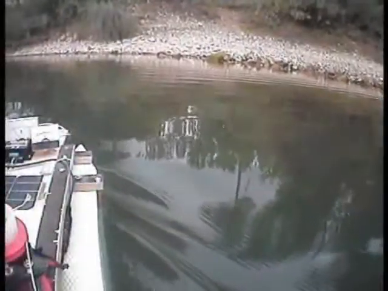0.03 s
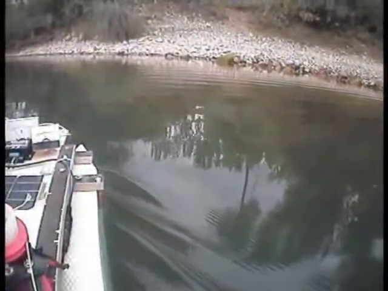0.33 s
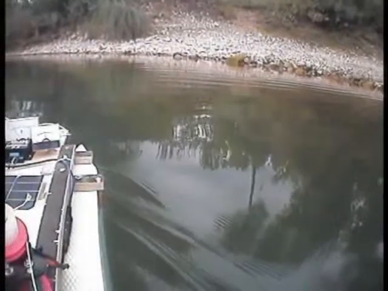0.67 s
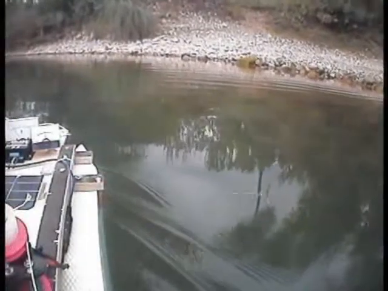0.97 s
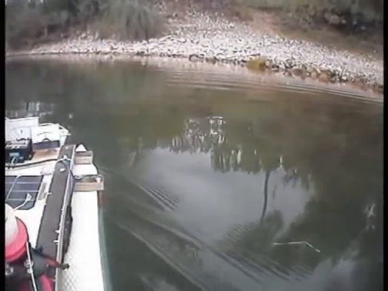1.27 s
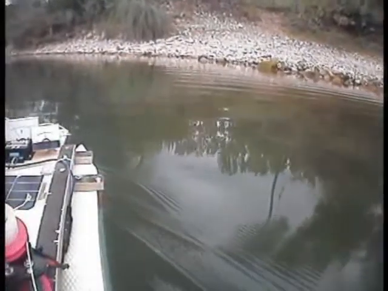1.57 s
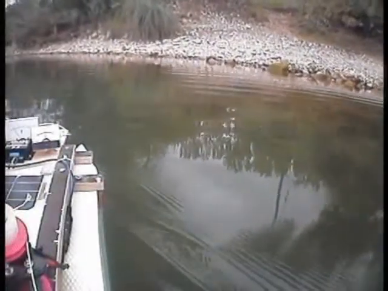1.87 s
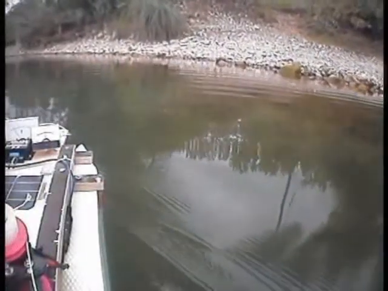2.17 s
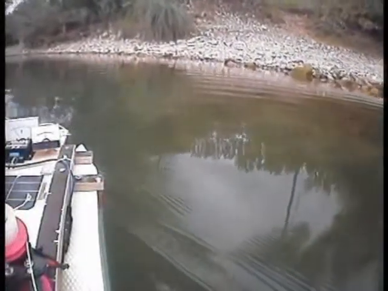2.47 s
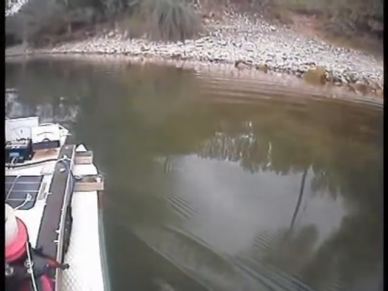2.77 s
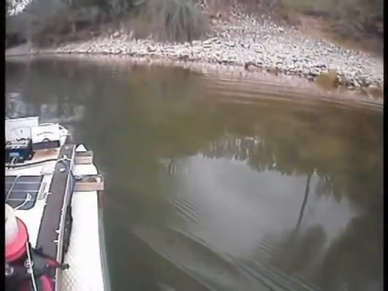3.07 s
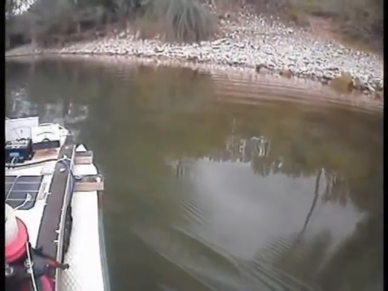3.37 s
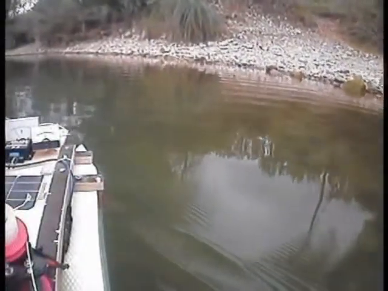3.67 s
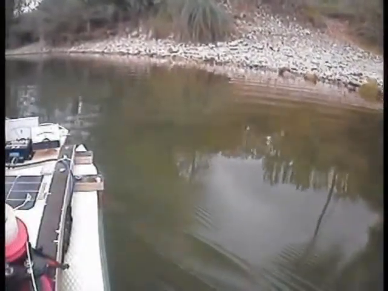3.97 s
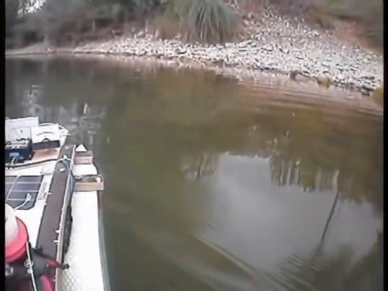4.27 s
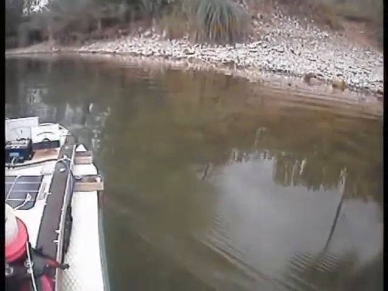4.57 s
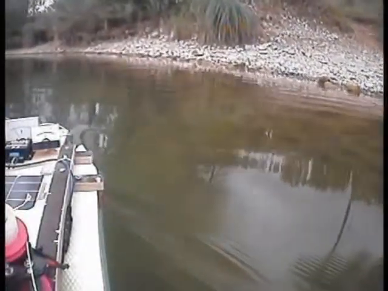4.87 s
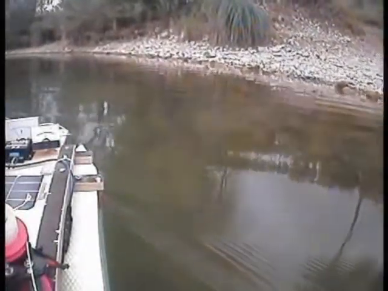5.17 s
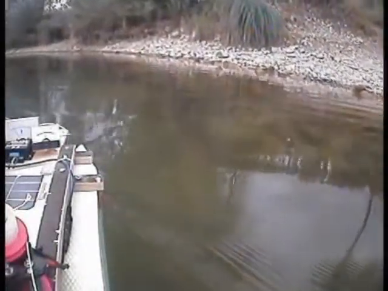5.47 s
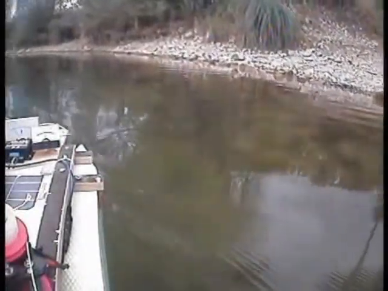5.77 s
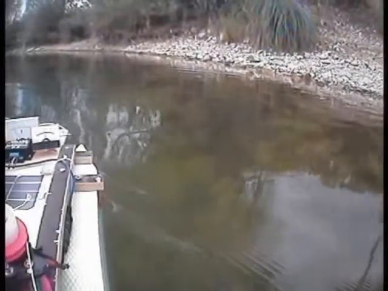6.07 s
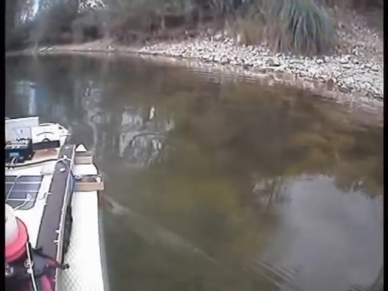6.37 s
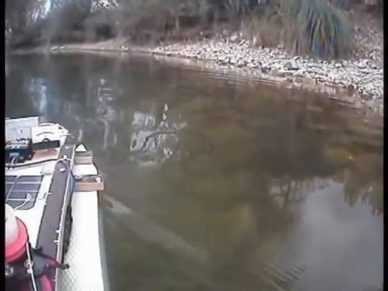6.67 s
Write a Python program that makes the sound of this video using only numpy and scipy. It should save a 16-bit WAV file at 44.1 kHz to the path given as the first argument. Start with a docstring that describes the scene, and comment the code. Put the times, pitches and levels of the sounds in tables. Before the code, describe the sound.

From the deck of a model boat on a pond, all in the left ear, comes a steady electrical buzz with a wavering, throbbing motor whine. Water washes softly along the hull beneath hiss, scattered spark snaps and a thin whistle. The motor backs off a little early on. The rudder servo buzzes in brief spurts, then works continuously through a long turn in the second half, as the whine gradually drops.

```python
"""A model boat cruising on a pond, heard from the one microphone of its deck camera, on the left.
From the start the motor whines in the hull and throbs with each shaft turn, over water, brush hiss and
the camera's line-scan whistle. Motor current, chopped once per radio frame, buzzes in the camera's
supply; sparks crackle and the rudder servo adds bursts of pulses. Just after 1 s the throttle eases.
From about 4 s the servo strains through a long turn, while the whine goes on slowly sinking."""
import sys
import numpy as np
from scipy import signal
from scipy.fft import rfft, irfft, next_fast_len
from scipy.io import wavfile
from scipy.ndimage import uniform_filter1d, map_coordinates

SR = 44100
rng = np.random.default_rng(int(sys.argv[2]) if len(sys.argv) > 2 else 0)


def waveform_to_disk(signal):
    """Save audio, clipped to [-1, 1], as 16-bit WAV at the path in sys.argv[1]."""
    frames = np.transpose(np.atleast_2d(signal))
    scaled = np.clip(frames, -1, 1) * 32767
    samples = np.round(scaled).astype(np.int16)
    wavfile.write(sys.argv[1], SR, samples)


N = 296440
T = np.arange(N) / SR
FRAME_HZ, FRAME_START, MOTOR_DELAY = 44.446, .104, .091  # radio frame rate; two offsets in frames
TOP_HZ = 15900  # the camera's band limit


def amp(db):
    """Decibels to gain."""
    return 10 ** (np.asarray(db) / 20)


def unit(x):
    """Scale to rms 1."""
    return x / np.sqrt(np.mean(x ** 2) + 1e-20)


def wobble(rate):
    """A smooth random curve, rate knots a second."""
    return map_coordinates(rng.standard_normal(int(N * rate / SR) + 4), [T * rate])


def filtered(x, response):
    """Pass x through a complex response of frequency."""
    size = next_fast_len(N + SR // 2)
    return irfft(rfft(x, size) * response(np.fft.rfftfreq(size, 1 / SR)), size)[:N]


def noise(spectrum):
    """Noise of rms 1 shaped by rows of frequency_hz, level_db."""
    hz, db = np.transpose(spectrum)
    colour = lambda f: amp(np.interp(np.log(f + 1), np.log(hz + 1), db))
    return unit(filtered(rng.standard_normal(N), colour))


def resonance(f, hz, width):
    """Causal response of one mode."""
    return 1j * f * width / (hz * hz - f * f + 1j * f * width)


def cycle(turns, lag):
    """A swing that peaks once a turn, lag turns late."""
    return np.cos(2 * np.pi * (turns - lag))


def wash():
    """Water runs along the hull, wavering slightly in level."""
    # water spectrum: frequency_hz, density_db
    spectrum = [(20, 13), (60, 6.5), (200, 1.5), (500, 2.5), (1300, -7), (2500, -17.5), (4000, -24)]
    return amp(-51.5 + .64 * wobble(11)) * noise(spectrum)


def whistle(level_db=-71, line_hz=15625, field_hz=50, blank_share=.12):
    """The camera's line-scan tone drops out once per field, flickers and flares now and then."""
    # flares of the whistle: centre_s, half_length_s, rise_db
    flares = [(.06, .2, 11), (3.48, .08, 10), (4.7, 0.34, 7)]
    flare_db = sum(rise_db * np.exp(-((T - s) / half) ** 2) for s, half, rise_db in flares)
    flicker_db = 3.5 * wobble(14)
    gate = uniform_filter1d(1. * (T * field_hz % 1 > blank_share), size=24)
    return amp(level_db + flare_db + flicker_db) * unit(gate * np.sin(2 * np.pi * line_hz * T))


def shaft_rub(shaft):
    """The shaft rubs once a turn and makes the drive sing faintly."""
    # narrow rings of the drive: pitch_hz, width_hz, level_db, swell_db, lag_turns
    rings = [(1792, 200, -63.5, 4.5, 0.54), (4470, 70, -72, 0, 0.18), (6730, 200, -71, 3, 0.039),
             (11750, 60, -78.5, 0, .2)]
    out = np.zeros(N)
    for hz, width, db, swell_db, lag in rings:
        ring = unit(filtered(rng.standard_normal(N), lambda f: resonance(f, hz, width) ** 2))
        out += ring * amp(db + swell_db * cycle(shaft, lag))
    return out


def brush_hiss(frame, shaft, level_db=-55.5, dull_hz=14000):
    """The motor brushes hiss, finely grained, pulsing a little with the frame and the shaft."""
    # hiss spectrum: frequency_hz, density_db
    spectrum = [(1180, -68), (2000, -3), (2100, -1), (2410, -7), (2760, -11), (3630, -13), (4890, -11),
                (5230, -11), (6930, -7.5), (8430, -15.5), (10800, -20.5), (11800, -21), (13600, -32),
                (14700, -16), (15300, -19.5)]
    sizzle = filtered(noise(spectrum), lambda f: 1 / (1 + (f / dull_hz) ** 8))
    pulse_db = 1.5 * cycle(frame, .51) + .83 * cycle(shaft, .19)
    return sizzle * amp(level_db + pulse_db + 1.97 * wobble(700))


def rattle(frame, shaft, level_db=-52):
    """Brushes and gears shake the hull, hardest under current."""
    # hull resonances: pitch_hz, width_hz, gain_db
    modes = [(530, 450, -12.5), (829, 142, -0.5), (1060, 97, 0), (1504, 530, -9.5), (2206, 800, -31)]
    pulse_db = 3 * cycle(frame, .29) + 1.9 * cycle(shaft, .33)
    shake = rng.standard_normal(N) * amp(pulse_db + wobble(300))
    hull = lambda f: sum((-1) ** k * amp(db) * resonance(f, hz, width)
                         for k, (hz, width, db) in enumerate(modes))
    return amp(level_db) * unit(filtered(shake, lambda f: hull(f) / (1 + (f / 2800) ** 4)))


def sparks(gain_db=1, tail_db=-22, tail_t60_s=.031):
    """Each spark is one spike with its own colour and a brief sizzle after it."""
    # loud sparks: start_s, relative_peak_db, centre_hz, width_octaves
    snaps = [(0.0664, -28.5, 3000, 2.45), (0.2411, -24.5, 6270, 2), (.414, -22.5, 3600, 3),
             (.598, -26.5, 6300, 1.3), (1.184, -25, 4400, 2.4), (1.3535, -33.5, 4500, 1.5),
             (1.5448, -29.5, 3980, 2.3), (2.158, -27.5, 2480, 2.7), (2.34, -33, 6600, 1.3),
             (2.531, -27, 5800, 0.99), (3.154, -34.5, 2800, 1.7), (3.339, -30.5, 2800, 2.7),
             (3.533, -32.5, 7350, 1.3), (5.1847, -29, 3900, 2.4), (5.5743, -32, 5200, 1.9),
             (6.2187, -33.5, 2000, 1.6)]
    out, t = np.zeros(N + SR), np.arange(SR // 20) / SR
    for start_s, db, hz, octaves in snaps:
        burst = (t == 0) + rng.standard_normal(len(t)) * amp(tail_db - 60 * t / tail_t60_s)
        band = np.minimum(hz * 2 ** (np.array([-.5, .5]) * octaves), TOP_HZ)
        snap = signal.sosfilt(signal.butter(2, band, "band", fs=SR, output="sos"), burst)
        out[round(start_s * SR):][:len(t)] += amp(db + gain_db) * snap / np.abs(snap).max()
    return out[:N]


def whine(frame, shaft, pitch_hz=1070, sink_hz_per_s=7, level_db=-48.5, fade_db_per_s=.36):
    """The commutator tone drops each frame and climbs back under current, scraping unevenly."""
    # commutator partials: harmonic_number, relative_db
    partials = [(1, -2.5), (2, -10.5), (3, -22), (6, -23)]
    # hull panels set ringing by the whine: pitch_hz, width_hz, over_direct_db
    panels = [(1029, 65, 2.5), (2110, 170, -0.5)]
    sag = uniform_filter1d(np.maximum(1 - (frame - MOTOR_DELAY) % 1 / .52, 0), size=220)
    depth = .19 * (1 + .542 * cycle(shaft, .58))  # deepest where the shaft binds
    speed = 1 + .037 * cycle(frame, .7) - depth * sag + .00897 * wobble(170)
    speed += .04025 * cycle(shaft, .0803) + .014 * cycle(shaft / 5, .82)  # a surge every fifth turn
    phase = 2 * np.pi * np.cumsum((pitch_hz - sink_hz_per_s * T) * speed) / SR
    tone = np.zeros(N)
    for k, db in partials:
        ratio = k * 1.02 ** (k - 1)  # the overtones lie sharp
        tone += amp(db) * unit(np.sin(ratio * phase) * amp(2 * wobble(200)))
    tone *= amp(1.83 * cycle(shaft, .39) + 3 * cycle(frame, .39))
    hull = lambda f: 1 + sum(amp(db) * resonance(f, hz, width) for hz, width, db in panels)
    return amp(level_db - fade_db_per_s * T) * unit(filtered(tone, hull))


def servo_current(frame, height=1.202, trim_ms=1.026, rise_ms=.76):
    """The working servo draws a pulse a frame that builds up and is cut dead, longer under strain."""
    # spells of rudder trimming: start_s, end_s
    trims = [(.05, .68), (.91, .93), (1.38, 1.475), (1.58, 1.77), (3.49, 3.57), (3.97, 6.72)]
    # rudder strain through the long turn: time_s, added_pulse_ms
    strain = [(4.63, 0), (4.68, 2.5), (4.8, 1.03), (5.06, 4), (5.15, 2), (5.52, 1.5), (5.7, 3), (6.02, 1.4),
              (6.06, 0), (6.18, 0), (6.28, 3)]
    # jerks of the rudder: start_s, end_s, pulse_ms
    jerks = [(.05, .12, 4.3), (4.555, 4.58, 7.5), (6.645, 6.72, 7.6)]
    index = frame.astype(int)
    frame_s = (np.arange(index[-1] + 1) - FRAME_START) / FRAME_HZ
    length_ms = trim_ms * sum((frame_s >= start) & (frame_s < end) for start, end in trims)
    length_ms += np.interp(frame_s, *np.transpose(strain))
    for start, end, jerk_ms in jerks:
        length_ms[(frame_s >= start) & (frame_s < end)] = jerk_ms
    length_ms *= np.exp(.1 * rng.standard_normal(len(frame_s)))
    age_ms = frame % 1 / FRAME_HZ * 1000
    return height * (1 - np.exp(-age_ms / rise_ms)) * (age_ms < length_ms[index])


def motor_current(frame, shaft, ease_s=(1.16, 1.23)):
    """The speed controller switches the motor on for the throttle's share of every frame."""
    duty = np.interp(T, ease_s, [.493, .423])
    load = 1 + .09 * cycle(shaft, .53)  # the shaft binds once a turn and draws more current
    return load * ((frame - MOTOR_DELAY) % 1 < duty)


def kicks(current, gain_db, centre_hz, width_hz):
    """Whenever the current is cut, the winding kicks back with a crisp tick."""
    cuts = np.minimum(np.diff(current, prepend=current[0]), 0) * amp(1.5 * wobble(90))
    tick = lambda f: resonance(f, centre_hz, width_hz) / (1 + 1j * f / 5000)
    return amp(gain_db) * filtered(cuts, tick)


def buzz(current, soft_hz, edge, gain_db=-25.5, coupling_hz=53, damping=1.465):
    """The camera's input coupling turns each supply step into a sharp-edged thump with an undershoot."""
    coupling = lambda f: -f * f / (coupling_hz ** 2 - f * f + 1j * f * coupling_hz * damping)
    thump = lambda f: 1 / (1 + 1j * f / soft_hz) + edge / (1 + 1j * f / 2000)
    return amp(gain_db) * filtered(current, lambda f: coupling(f) * thump(f))


def scene(shaft_hz=5.32, slowing_hz_per_s=.084):
    """On deck, drive and buzz follow the radio frame and the shaft; only a trace reaches the right."""
    frame = T * FRAME_HZ + FRAME_START  # frames elapsed
    shaft = np.cumsum(shaft_hz - slowing_hz_per_s * T) / SR  # turns elapsed
    motor, servo = motor_current(frame, shaft), servo_current(frame)
    ticks = kicks(motor, gain_db=-25.5, centre_hz=2730, width_hz=1300)
    ticks += kicks(servo, gain_db=-22, centre_hz=2500, width_hz=1860)
    supply = buzz(motor, soft_hz=314, edge=.012) + buzz(servo, soft_hz=800, edge=.08)
    electrics = supply + ticks + sparks() + whistle()
    drive = whine(frame, shaft) + rattle(frame, shaft) + shaft_rub(shaft) + brush_hiss(frame, shaft)
    mono = electrics + drive + wash()
    return np.array([2 * mono, amp(-53.5) * mono])


def record(dry):
    """The camera keeps nothing above its band limit."""
    return np.array([filtered(x, lambda f: f < TOP_HZ) for x in dry])


dry = scene()
out = record(dry)
waveform_to_disk(out)
```